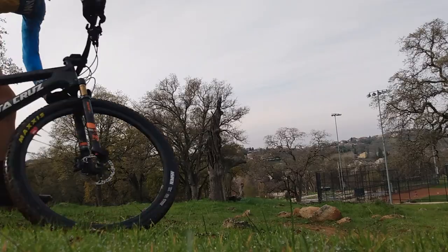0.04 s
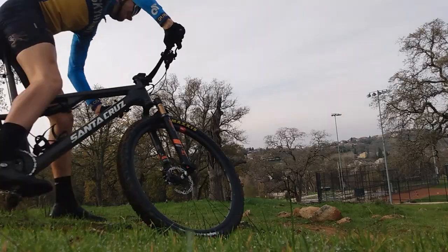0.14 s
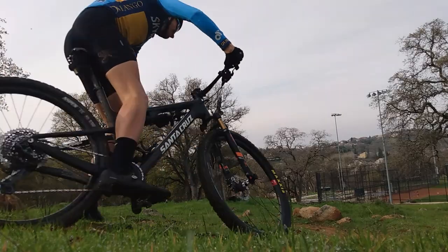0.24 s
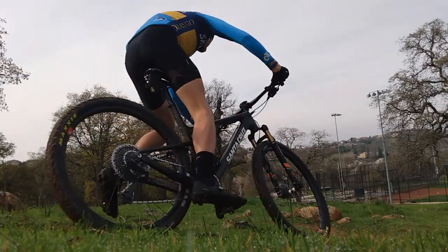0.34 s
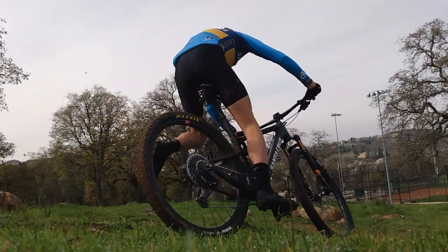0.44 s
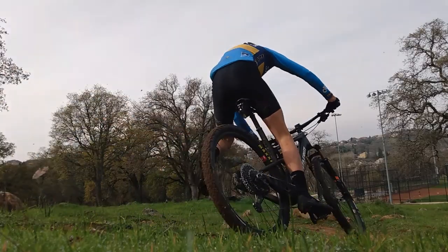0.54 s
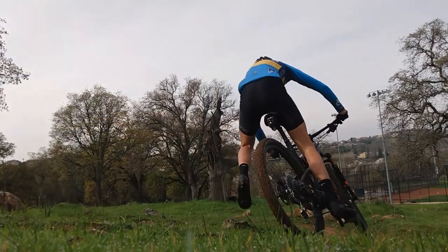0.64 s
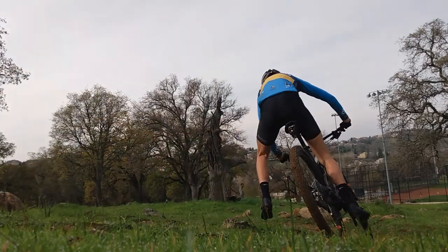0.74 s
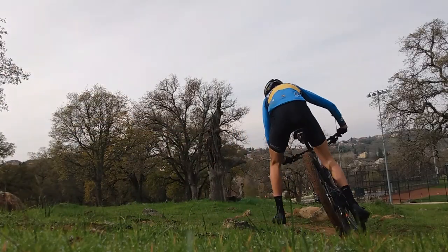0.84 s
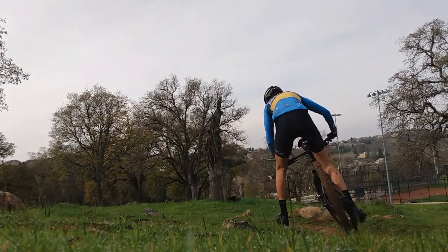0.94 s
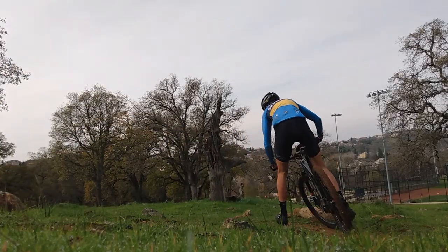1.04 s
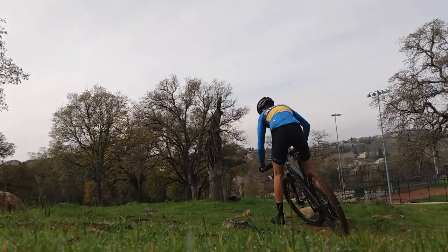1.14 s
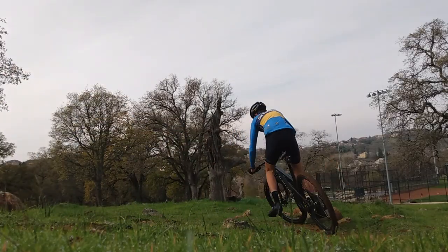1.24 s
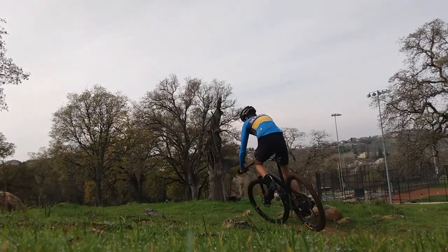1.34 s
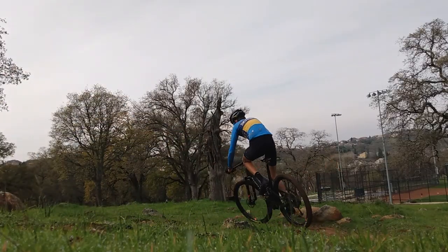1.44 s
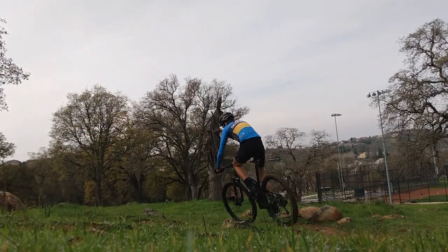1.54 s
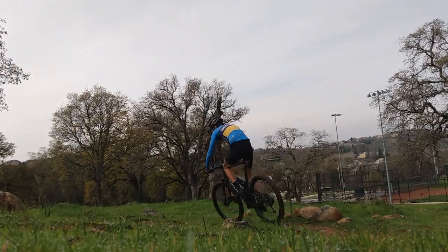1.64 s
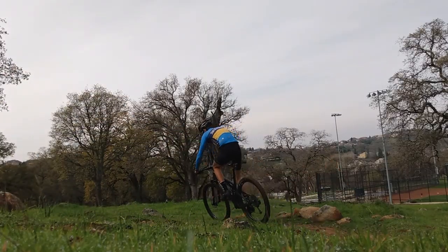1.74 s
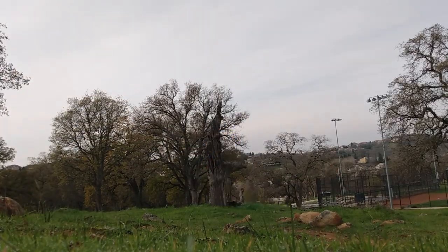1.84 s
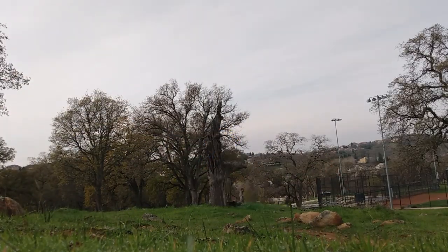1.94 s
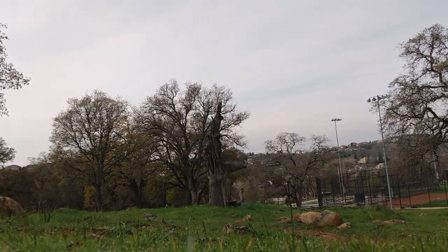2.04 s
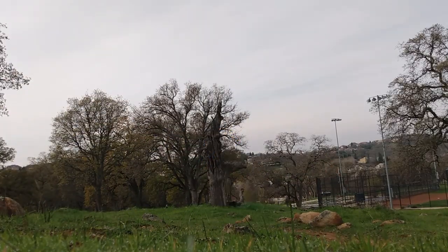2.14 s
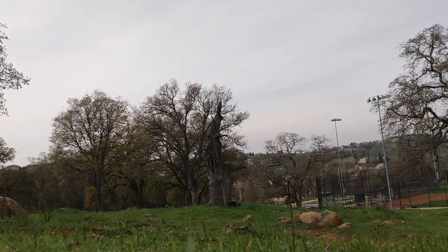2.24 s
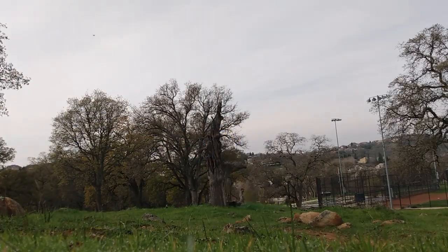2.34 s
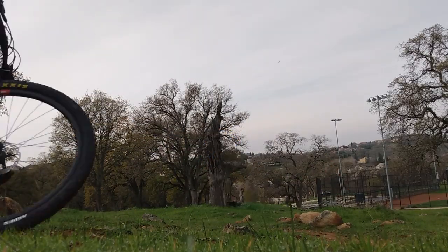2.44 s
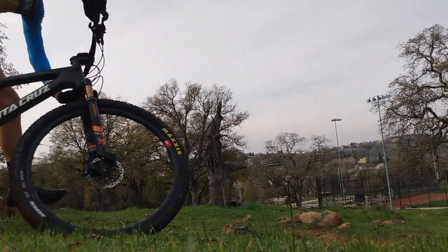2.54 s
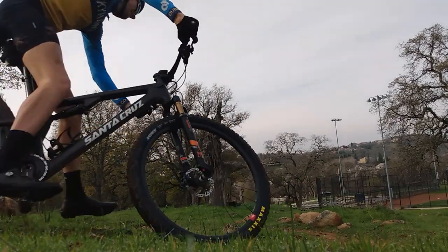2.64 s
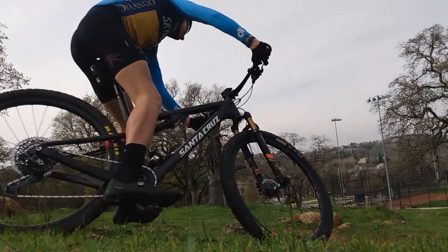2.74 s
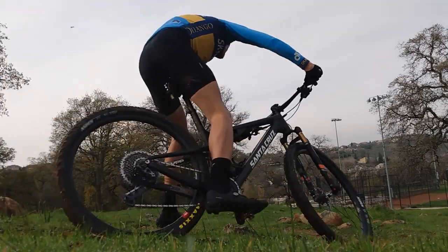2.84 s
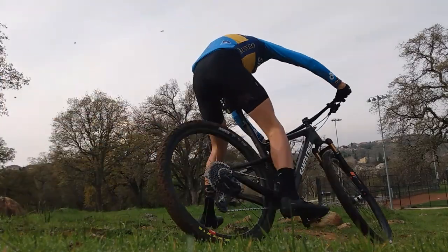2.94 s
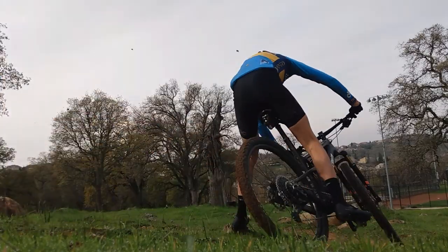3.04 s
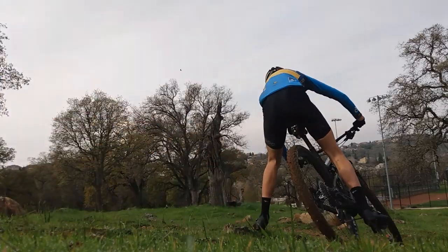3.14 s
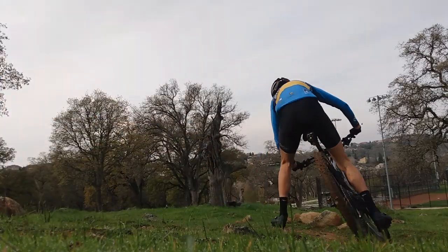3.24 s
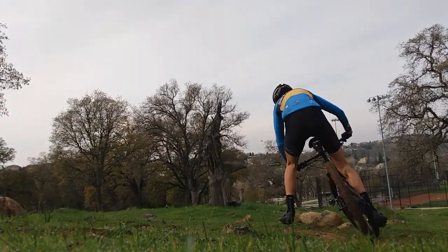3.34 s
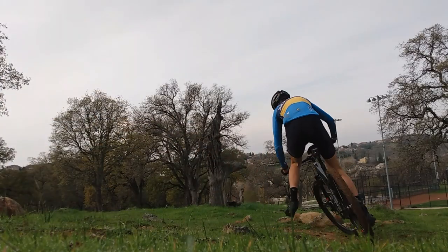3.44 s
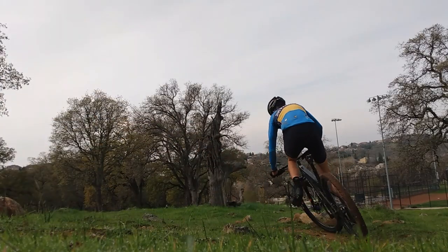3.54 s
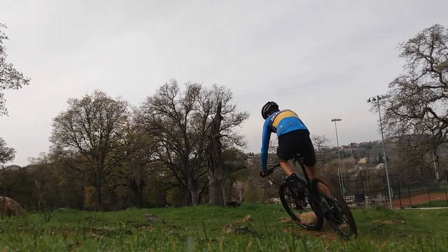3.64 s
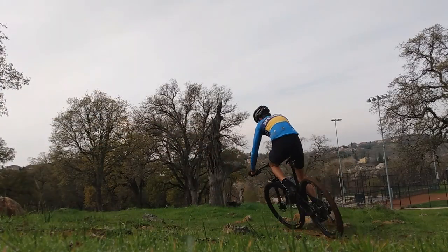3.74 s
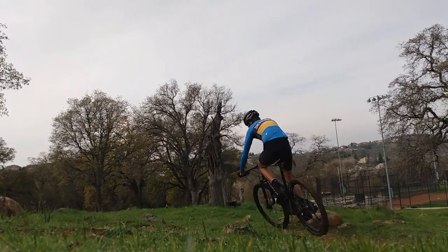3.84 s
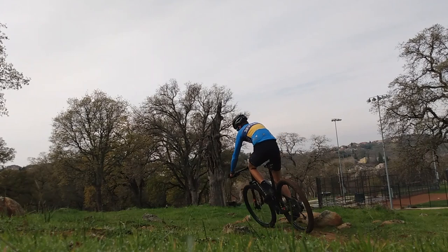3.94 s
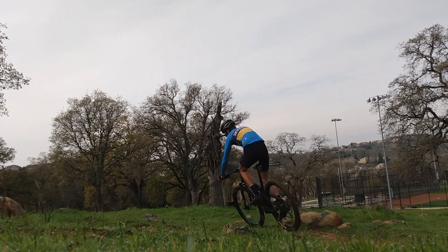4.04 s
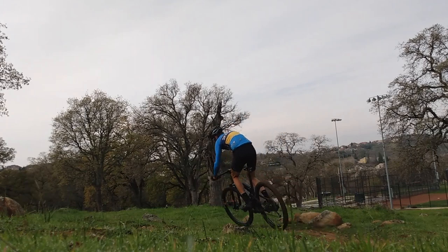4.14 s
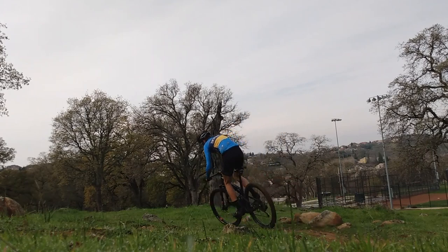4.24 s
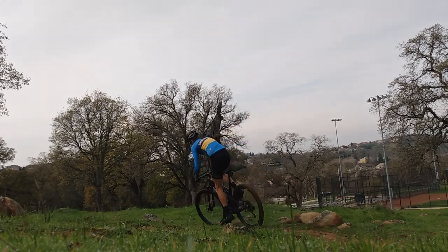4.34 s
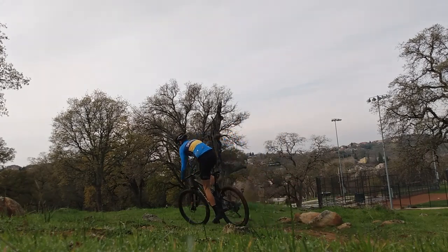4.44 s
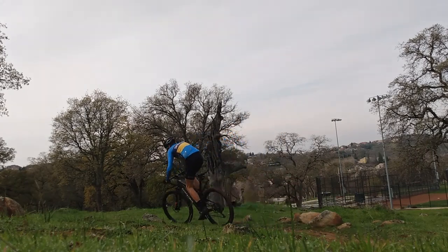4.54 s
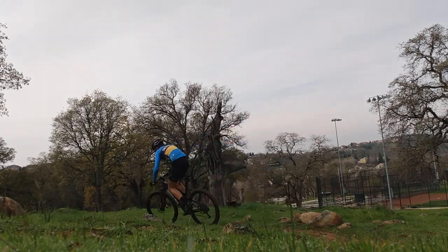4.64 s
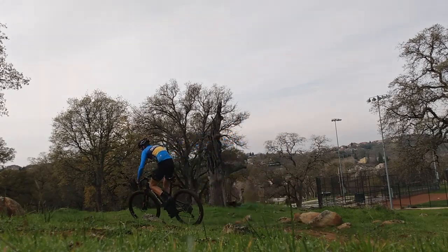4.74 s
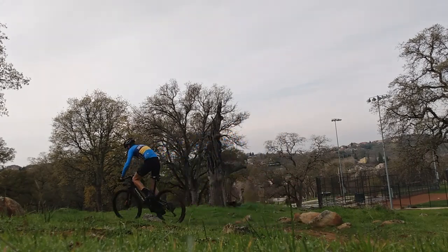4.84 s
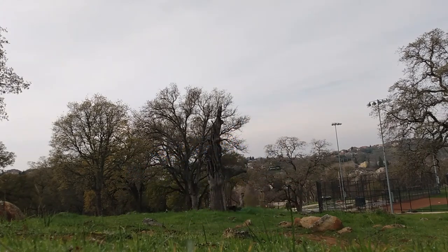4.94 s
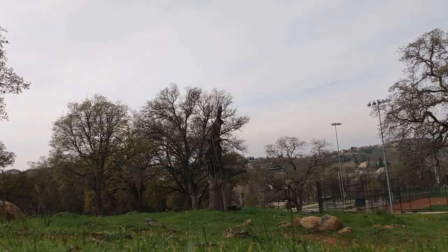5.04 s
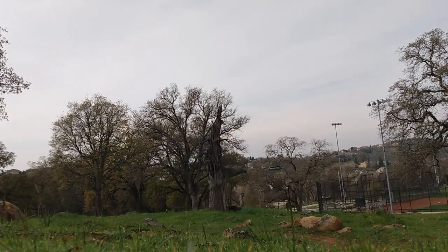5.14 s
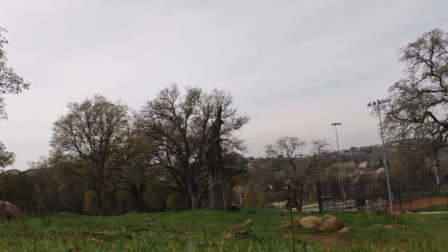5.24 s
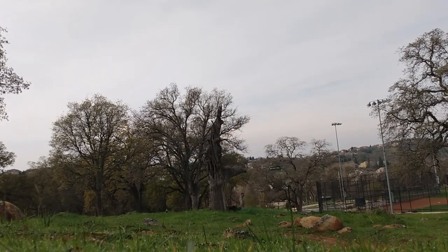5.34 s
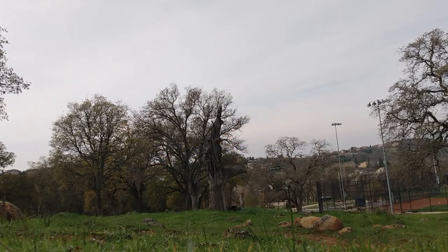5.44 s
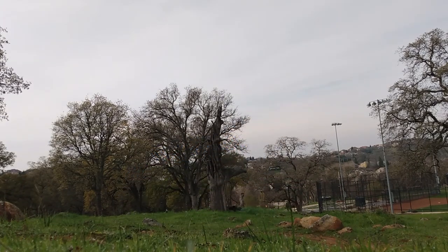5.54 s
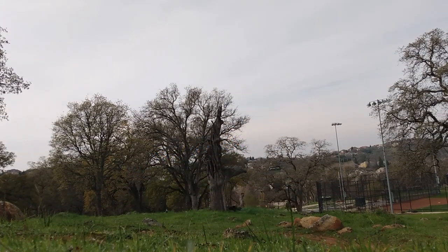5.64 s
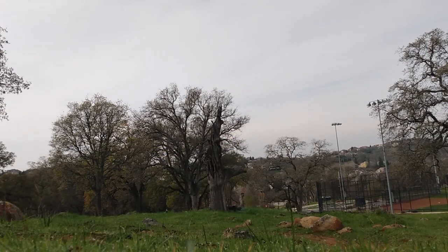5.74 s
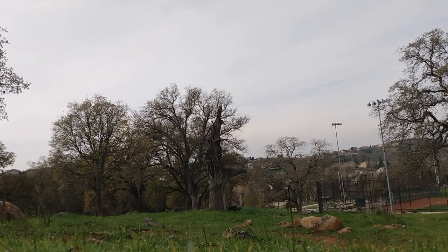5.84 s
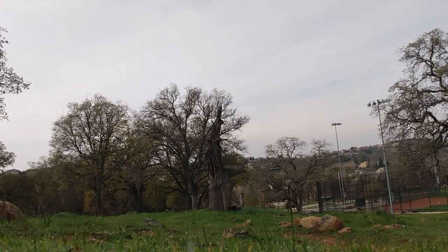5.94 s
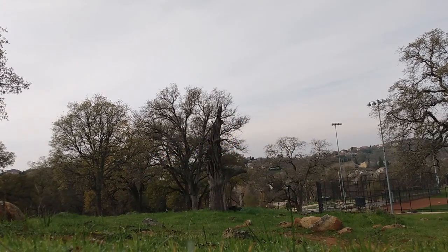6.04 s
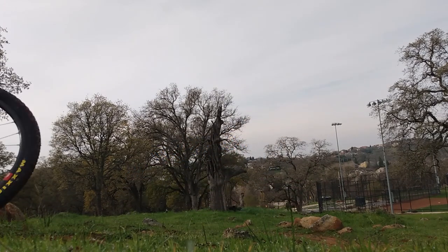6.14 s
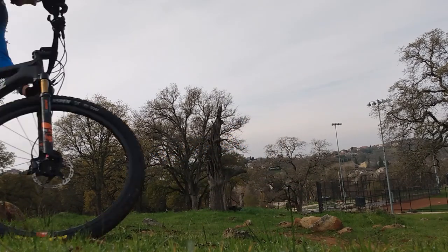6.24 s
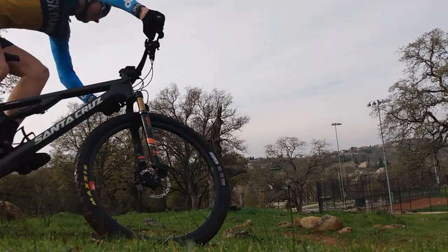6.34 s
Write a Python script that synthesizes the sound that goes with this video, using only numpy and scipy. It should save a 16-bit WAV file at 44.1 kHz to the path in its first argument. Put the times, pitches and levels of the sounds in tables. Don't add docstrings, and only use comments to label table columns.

```python
import sys
import numpy as np
from scipy import signal
from scipy.io import wavfile
from scipy.ndimage import uniform_filter1d

SR = 44100
rng = np.random.default_rng(int(sys.argv[2]) if len(sys.argv) > 2 else 0)


def digitize_waveform(pressure):
    field = np.atleast_2d(pressure).T
    bounded = np.clip(field, -1, 1)
    quanta = np.round(bounded * 32767).astype(np.int16)
    wavfile.write(sys.argv[1], SR, quanta)


def convert_level_to_amplitude(level_db):
    exponent = np.asarray(level_db, float) / 20
    return 10 ** exponent


N = 281648

# time of silence in seconds, fade out in seconds, fade in in seconds.
JOINS = [
    (1.864, 0.051, 0.064),
    (4.964, 0.032, 0.036),
]
# time in seconds, lag of the left microphone in ms.
LEFT_LAG_MS = [(0, 0.36), (.25, 0.37), (.4, 0.18), (.55, 0.026), (.8, -0.13), (1.5, -0.13), (1.86, 0.094),
               (1.88, 0.4), (2.65, 0.37), (2.85, 0.25), (3.05, 0.025), (3.35, -0.19), (4.96, 0.03),
               (4.98, 0.45), (6.15, 0.36), (6.39, 0.35)]
# centre in Hz, width in Hz, depth in dB.
FAR_DIPS = [(4600, 300, -11), (6900, 400, -10), (9300, 1300, -7)]

# peak in seconds, level in dB, left over right in dB.
GUSTS = [(.12, -46.5, -4), (.31, -37, -1), (.6, -61, -7), (.83, -50, 8), (.96, -63, 12), (1.07, -54, 11),
         (1.25, -56, -1), (1.55, -60, -10), (1.68, -52.5, 6), (1.8, -49.5, -13), (2.17, -68, 1),
         (2.64, -48, 2), (2.78, -48, -1), (2.9, -60, 4), (3.21, -46.5, -1), (3.52, -64, 14),
         (3.77, -70, -8), (3.94, -64.5, 10.5), (5.161, -62, 13.5), (5.45, -71, 7), (5.691, -55, -11.5),
         (6.1, -66, 0), (6.35, -53, -9)]
GUST_DB_PER_S, CALM_DB = 76, -85
# frequency in Hz, gain in dB.
RUMBLE_SPECTRUM = [(25, -42.5), (55, -9.5), (80, 0.5), (130, -0.5), (180, -15), (220, -18.5), (290, -44.5),
                   (480, -120)]
# frequency in Hz, gain in dB.
AIR_SPECTRUM = [(10, -14), (25, -3), (45, -3), (70, -20), (120, -60.5)]
AIR_DB, AIR_EXPONENT = -27, 0.68

# time in seconds, level in dB.
GRASS_DB = [(0.0, -41), (0.41, -40.5), (0.44, -49.5), (0.75, -45.5), (1.08, -61.5), (1.86, -57),
            (1.88, -70.5), (2.12, -51.5), (2.42, -52), (2.58, -40.5), (3.13, -45.5), (3.75, -62.5),
            (3.87, -54.5), (4.2, -72.5), (4.81, -77.5), (4.86, -58), (4.95, -73), (4.98, -86), (5.38, -74),
            (5.46, -67), (6.39, -45.5)]
# frequency in Hz, gain in dB.
GRASS_SPECTRUM = [(2650, -31.5), (4500, -2), (5180, -5.5), (5700, -5), (14200, -4), (16300, -4)]

# start in seconds, end in seconds, first Hz, last Hz, level in dB.
WHIRRS = [(0.854, 1.283, 1160, 907, -61), (0.93, 1.075, 1400, 1432, -58.5), (1.317, 1.353, 587, 604, -69),
          (1.435, 1.526, 278, 254, -67), (1.905, 2.046, 1050, 1097, -62.5),
          (3.238, 3.26, 1370, 1240, -37.5), (3.402, 3.582, 251, 236.4, -63), (4.08, 4.21, 1450, 1433, -79),
          (4.225, 4.265, 214, 230, -64.5), (4.239, 4.339, 354, 317, -65.5), (4.22, 4.34, 1400, 1390, -75.5),
          (4.232, 4.405, 640, 614, -78.5), (4.384, 4.48, 1400, 1420, -78), (5.148, 5.6, 1190, 1144, -83),
          (1.151, 1.35, 1330, 1285, -70), (4.362, 4.416, 356, 365, -72.5), (4.624, 4.661, 650, 644, -75.5),
          (4.715, 4.785, 718, 700, -67), (4.976, 5.15, 1003, 1004, -70.5), (4.992, 5.198, 1837, 1860, -78),
          (5.065, 5.292, 2460, 2270, -74.5), (5.261, 5.976, 2213, 2376, -72),
          (5.329, 5.445, 940, 1060, -71), (5.425, 5.52, 623, 803, -76.5), (5.413, 5.504, 240, 240, -75),
          (5.58, 5.984, 447.4, 766, -66.5)]
WHIRR_WIDTH = 0.17

# time in seconds, load in dB, lightness in dB (less carcass, more knobs).
ROLL = [(.44, -52, 0.5), (.9, -57, -3), (1.04, -74.5, 8), (1.6, -71.5, 5), (1.7, -58.5, -7),
        (1.9, -67.5, -1.5), (2.19, -57.5, -3), (2.35, -57, -2.5), (2.71, -47.5, 0), (3.26, -50.5, -0.5),
        (3.7, -71, 5.5), (3.98, -65.5, 3), (4.12, -84, 3), (4.9, -92.5, -5.5), (5.3, -81, 5.5),
        (5.66, -75, 8.5), (6.06, -56.5, -4.5), (6.39, -50, -0.8)]
CARCASS_DB_PER_LIGHT_DB = 0.91
# full bite in seconds, rise in seconds, hold in seconds, bite in dB,
# carcass weight in dB.
SCRUBS = [(0.0, .02, 0.0053, -28.5, -6.5), (0.028, .02, 0.046, -26.5, -13.5),
          (0.098, 0.019, 0.034, -27, -8), (0.162, 0.12, 0.074, -31.5, -4.5), (0.241, 0.1, 0.12, -34.5, -2),
          (0.363, .1, 0.06, -43.5, -5), (0.578, 0.04, 0.022, -49.5, -4), (0.709, 0.057, 0.086, -40, -1),
          (0.917, .08, 0.18, -61, -29), (1.664, 0.025, 0.003, -42, 6), (2.124, 0.12, 0.041, -45.5, 0.5),
          (2.561, 0.15, 0.044, -27.5, -8), (2.604, 0.045, 0.057, -33, -4), (3.199, 0.087, 0.014, -32, 2),
          (3.872, 0.019, 0.015, -49, 5.5), (4.256, 0.068, 0.022, -86, -1),
          (4.733, 0.12, 0.038, -74.5, -27.5), (4.829, 0.01, 0.0062, -50.5, -11),
          (4.866, 0.027, 0.055, -68.5, -25), (5.013, 0.086, 0.095, -76, -37), (5.437, 0.097, .02, -65, -16),
          (5.8, 0.07, 0.062, -68.5, 1.5)]
EDGE_DB, RELEASE_S = 24.5, 0.062
GRIT_DB, GRIT_DB_PER_WEIGHT_DB = -4.5, 0.6
# frequency in Hz, gain in dB.
THUD_SPECTRUM = [(120, -25), (200, -1), (372, -4), (454, -1.5), (680, -5.5), (880, -30), (1500, -120)]
# frequency in Hz, gain in dB.
CRUNCH_SPECTRUM = [(380, -45.5), (650, -9), (814, -1), (908, -2.5), (1550, -10.5), (2020, -37),
                   (3410, -120)]
# frequency in Hz, gain in dB.
GRIT_SPECTRUM = [(880, -40), (1500, -10.5), (1800, -7.5), (2710, -8.5), (4930, -20.5), (5500, -34.5),
                 (7150, -46.5), (12100, -120)]

# time in seconds, peak in dB, pitch in Hz.
STONES = [(0.032, -25, 2370), (0.049, -22, 1940), (0.065, -17.5, 804), (0.073, -12.5, 1070),
          (0.1, -31.5, 810), (0.111, -23, 834), (0.123, -5, 1050), (0.133, -17.5, 853), (0.15, -15, 2650),
          (0.17, -27, 2450), (0.194, -23, 3050), (0.249, -30, 2280), (0.263, -35, 802), (0.277, -28, 830),
          (0.331, -31, 1280), (0.36, -21.5, 859), (2.537, -27.5, 837), (2.55, -24.5, 797),
          (2.562, -18, 848), (2.576, -19.5, 904), (2.582, -10.5, 875), (2.605, -24, 2270),
          (2.612, -22, 875), (2.622, -26, 845), (2.639, -42, 2574), (2.649, -33, 820)]
STONE_DB, STONE_BRIGHT_DB = -12.5, -12
# time in seconds, peak in dB, body or
# squeak pitch in Hz.
THUMPS = [(0.3122, -29.5, 300), (0.7768, -44, 666), (0.8437, -39.5, 650), (1.6517, -69.5, 382),
          (1.6717, -32.5, 830), (1.7745, -50, 570), (1.8188, -43, 590), (2.058, -47.5, 3530),
          (2.059, -42, 7030), (2.0953, -31, 1650), (2.1255, -31, 1440), (2.143, -32, 635),
          (2.1597, -32, 596), (2.218, -50, 507), (3.196, -24, 786), (3.2192, -21, 525), (3.2549, -39, 710),
          (3.849, -50, 660), (3.8768, -30, 679), (3.881, -29, 1574), (4.6962, -57, 734),
          (4.834, -41.5, 1070), (5.8839, -57, 676), (6.2617, -43, 403)]
THUMP_BRIGHT_DB = -26
# time in seconds, peak in dB, body in Hz, bright clack in dB.
KNOCKS = [(0.2078, -43, 2620, 19.5), (0.297, -28, 320, 2), (0.406, -48, 320, 4.5), (0.4136, -35.5, 300, 13),
          (0.7823, -33, 517, -18), (0.79, -32.5, 478, -18), (1.6682, -41, 342, 16.5),
          (1.6779, -45, 464, 18.5), (1.7293, -40, 960, -2), (1.8956, -44, 544, -11),
          (2.1045, -50, 900, 21.5), (1.6645, -34, 250, -2), (2.1059, -28.5, 980, -27),
          (2.1675, -40, 554, 3), (3.1401, -30, 790, -2), (3.187, -16.5, 620, -8.5),
          (3.2045, -15.5, 700, -6.5), (3.2065, -20.5, 800, -3.5), (3.2114, -12.5, 750, -17),
          (3.2247, -34.5, 600, 7.5), (3.8887, -29.5, 945, -3.5), (4.406, -67, 368, 6),
          (4.715, -55, 715, -9.5), (4.8465, -43, 620, 6.5), (5.759, -66, 2720, 7), (6.2498, -40.5, 550, 2)]

CHAIN_S, CHAIN_PER_S = (4.13, 4.95), 450
CHAIN_DB, CHAIN_SPREAD_DB = -63, 2.5
# first tick in seconds, last tick in seconds, mean gap in ms,
# last gap over first gap.
COAST = [(.0405, .359, 15.9, 1), (.372, .4123, 13.4, 1), (.4372, .4572, 20, 1), (.471, .5346, 10.6, .85),
         (.5489, .6952, 18.3, 1), (.7271, .8388, 22.3, 1), (.855, .9076, 13.2, 1.3),
         (.927, 1.0045, 19.4, .55), (1.019, 1.1234, 17.4, 1), (1.1345, 1.2277, 13.3, 1.1),
         (1.243, 1.3263, 16.7, 1.1), (1.3421, 1.48, 15.3, 1), (1.4966, 1.6352, 17.3, .95),
         (1.6494, 1.708, 14.6, 1), (1.7243, 1.847, 24.5, 1.35), (2.3027, 2.7143, 16, 1.4),
         (2.7294, 2.8005, 11.9, 1), (2.817, 2.9235, 11.8, .65), (2.9686, 3.1489, 12.9, 1.05),
         (3.1661, 3.3963, 14.4, .9), (3.4235, 3.485, 15.4, 1.2), (3.5338, 3.5554, 10.8, 1),
         (3.575, 3.5997, 12.3, .8), (3.622, 3.7377, 12.9, .75), (3.756, 3.813, 19, 1),
         (3.827, 3.8615, 11.5, 1), (3.895, 3.958, 15.8, 1), (3.9725, 4.111, 27.7, 1.3),
         (5.3088, 5.6687, 12, 1), (5.7097, 5.9126, 13.5, 1), (5.929, 6.0559, 15.9, 1),
         (6.0682, 6.1534, 14.2, 1), (6.1708, 6.3729, 15.5, 1)]
TICK_JITTER_S = .0005
# time in seconds, peak in dB.
PAWL_DB = [(.037, -37.5), (.41, -38.5), (.44, -35.5), (.87, -41.5), (1.06, -42), (1.65, -39), (1.82, -44.5),
                      (2.3, -64), (2.89, -33.5), (3.48, -44), (3.56, -39), (3.62, -40.5), (3.72, -41),
           (3.82, -43), (4.11, -40.5), (5.31, -68.5), (5.45, -66), (5.65, -55.5), (5.9, -59), (6.37, -42)]
# time in seconds, peak in dB.
RATTLE = [(1.666, -29), (2.0919, -50), (2.104, -36.5), (2.2434, -49), (2.294, -46), (3.512, -40),
          (3.6512, -38), (3.6782, -38), (3.7144, -38.5), (3.727, -41), (3.756, -38.5), (0.8648, -36.5),
          (1.088, -47), (1.534, -49), (1.6, -43), (3.8806, -32), (4.166, -60), (4.2448, -54.5),
          (4.2705, -59), (4.283, -52), (4.2973, -63), (4.3912, -58), (4.403, -42), (4.4316, -66),
          (4.3633, -61), (4.5247, -63), (4.5464, -58.5), (1.9357, -61), (1.9706, -56), (1.9791, -53),
          (2.2245, -64), (4.446, -51), (4.498, -61.5), (4.595, -49), (4.624, -62), (4.6435, -56),
          (4.692, -61), (4.714, -52), (4.751, -57), (4.772, -59), (4.8326, -38), (4.844, -40), (4.898, -54),
          (4.9466, -51.5), (5.692, -47), (5.754, -46)]
# frequency in Hz, gain in dB.
HUB_SPECTRUM = [(1180, -59), (2000, -40), (2740, -8), (4180, -16.5), (4690, -13), (6260, -8.5),
                (7080, -5.5), (10900, -3), (15100, -2), (16300, -9)]
FAR_THINS, THIN_HZ = .62, 11800

LIMIT = .75
EDGE_HZ = 15950


def evened(x):
    return x / np.sqrt(np.mean(x ** 2) + 1e-20)


def curve(rows, axis=1):
    rows = np.asarray(rows, float)
    return np.interp(np.arange(N) / SR, rows[:, 0], rows[:, axis])


def colour(x, points, size=4096):
    f, db = np.transpose(points)
    hz = abs(np.fft.fftfreq(size, 1 / SR))
    gain_db = np.interp(np.log(hz + 1), np.log(f + 1), db, left=-70, right=-70)
    log_gain = np.log(convert_level_to_amplitude(gain_db))
    taps = np.fft.ifft(np.exp(np.conj(signal.hilbert(log_gain)))).real[:size // 2]
    return signal.oaconvolve(x, taps[None], axes=1)[:, :N]


def paired(x, same):
    same = np.clip(same, 0, 1)
    return np.array([x[0], same * x[0] + np.sqrt(1 - same ** 2) * x[1]])


def grains(per_s, spread_db, clump_db, clump_s):
    clumps = evened(uniform_filter1d(rng.standard_normal(N), max(int(clump_s * SR), 2)))
    sizes = convert_level_to_amplitude(spread_db * np.minimum(rng.exponential(1, (2, N)), 5))
    signs = rng.choice([-1., 1.], (2, N))
    hits = rng.random((2, N)) < per_s / SR
    return sizes * signs * hits * convert_level_to_amplitude(clump_db * clumps)


def far(t):
    return np.clip((-48 - np.interp(t, *np.transpose(GRASS_DB))) / 22, 0, 1)


def patches(shape, wide, long):
    field = uniform_filter1d(rng.standard_normal(shape), wide, 0)
    return evened(uniform_filter1d(field, long, 1))


def patchy(x, near_db, far_db, wide, long):
    hz, t, z = signal.stft(x, SR, nperseg=1024, noverlap=768)
    depth_db = near_db + (far_db - near_db) * far(t)
    z = z * convert_level_to_amplitude(depth_db * patches(z.shape[1:], wide, long))
    return signal.istft(z, SR, nperseg=1024, noverlap=768)[1][:, :N]


def gusts():
    t, cuts = np.arange(N) / SR, np.transpose(JOINS)[0]
    power = convert_level_to_amplitude(CALM_DB) ** 2
    for s, db, pan_db in GUSTS:
        same_pass = np.searchsorted(cuts, t) == np.searchsorted(cuts, s)
        pan = convert_level_to_amplitude(np.minimum([[pan_db], [-pan_db]], 0))
        power = power + (convert_level_to_amplitude(db - GUST_DB_PER_S * abs(t - s)) * same_pass * pan) ** 2
    return np.sqrt(power)


def wind():
    puffs = gusts()
    rumble = paired(colour(grains(3600, 0.9, 1.0, 0.0088), RUMBLE_SPECTRUM), 0.66)
    air = evened(colour(rng.standard_normal((2, N)), AIR_SPECTRUM, size=16384))
    return puffs * evened(rumble) + convert_level_to_amplitude(AIR_DB) * puffs ** AIR_EXPONENT * air


def grass():
    hiss = paired(colour(grains(20000, 2.2, 3.0, 0.0058), GRASS_SPECTRUM), 0.19)
    return patchy(convert_level_to_amplitude(curve(GRASS_DB) - 1.5) * evened(hiss), 1.5, 3.5, wide=8, long=30)


def whirr():
    out = np.zeros((2, N))
    for first, last, first_hz, last_hz, db in WHIRRS:
        share = np.linspace(0, 1, round((last - first) * SR))
        r = np.exp(-np.pi * WHIRR_WIDTH * first_hz / SR)
        noise = rng.standard_normal((2, 2, len(share)))
        slow = signal.lfilter([1], [1, -2 * r, r * r], noise[0] + 1j * noise[1])
        turns = np.cumsum(first_hz * (last_hz / first_hz) ** share) / SR
        hum = paired(evened((slow * np.exp(2j * np.pi * turns)).real), 0.56)
        swell = np.sqrt(abs(np.sin(np.pi * share)))
        out[:, round(first * SR):][:, :len(share)] += convert_level_to_amplitude(db) * swell * hum
    return out


def bite():
    t, light_db = np.arange(N) / SR, curve(ROLL, axis=2)
    carcass_db = -CARCASS_DB_PER_LIGHT_DB * np.maximum(light_db, -3)
    power = convert_level_to_amplitude(curve(ROLL) + np.array([carcass_db, 0 * t, light_db])) ** 2
    for s, rise, hold, db, weight_db in SCRUBS:
        away = np.maximum(np.maximum((s - t) / rise, (t - s - hold) / RELEASE_S), 0)
        grit_db = GRIT_DB - GRIT_DB_PER_WEIGHT_DB * max(weight_db - 0.5, 0)
        layers_db = np.array([[weight_db], [0], [grit_db]])
        power = power + convert_level_to_amplitude(db + layers_db) ** 2 * convert_level_to_amplitude(-EDGE_DB * away) ** 2
    return np.sqrt(power)


def tyres():
    snaps = grains(2100, 2.01, 1.7, 0.011)
    thud = paired(colour(snaps, THUD_SPECTRUM), 0.96)
    crunch = paired(colour(snaps, CRUNCH_SPECTRUM), 0.94)
    grit = paired(colour(snaps, GRIT_SPECTRUM), 0.78)
    dirt = sum(gain * evened(x) for gain, x in zip(bite(), [thud, crunch, grit]))
    bass = signal.sosfiltfilt(signal.butter(4, 240, fs=SR, output="sos"), dirt)
    dirt = dirt - 0.63 * far(np.arange(N) / SR) * bass
    return patchy(dirt, 1.5, 5.5, wide=3, long=24)


def knocks():
    thumps = [(*row, THUMP_BRIGHT_DB) for row in THUMPS]
    stones = [(s, db + STONE_DB, hz, STONE_BRIGHT_DB) for s, db, hz in STONES]
    out, t = np.zeros((2, N + SR)), np.arange(-100, 1500) / SR
    for s, db, hz, bright_db in [*KNOCKS, *thumps, *stones]:
        noise = rng.standard_normal((2, len(t)))
        turn, bright_hz = rng.uniform((0, 1900), (1, 3000))
        squeak = hz > 3200
        cycles = 9 if squeak else 0.48 + (db < -44)
        swell = np.exp(-.5 * ((t - 0.0017 * squeak) * hz / cycles) ** 2)
        blow = swell * np.cos(2 * np.pi * (hz * t + turn))
        clack = np.cos(2 * np.pi * bright_hz * t) + .5 * noise[0]
        clack = np.exp(-abs(t) / 0.00035) * clack * convert_level_to_amplitude(bright_db - 1.5)
        b, a = signal.butter(2, [0.78 * hz, 2.29 * hz], "bandpass", fs=SR)
        tail = evened(paired(signal.lfilter(b, a, noise), 0.35))
        tail = 0.18 * (not squeak) * tail * convert_level_to_amplitude(-60 * abs(t) / np.where(t > 0, .04, .006))
        start = round(s * SR) - 100
        out[:, start:start + len(t)] += convert_level_to_amplitude(db + 7.5) * (blow + clack + tail)
    return signal.sosfilt(signal.butter(4, 230, "highpass", fs=SR, output="sos"), out[:, :N])


def chain():
    t = np.arange(N) / SR
    links = (rng.random(N) < CHAIN_PER_S / SR) & (t > CHAIN_S[0]) & (t < CHAIN_S[1])
    return links * convert_level_to_amplitude(CHAIN_DB + CHAIN_SPREAD_DB * rng.standard_normal(N))


def pawls():
    spells = []
    for first, last, gap_ms, slowing in COAST:
        gaps = np.linspace(1, slowing, round(1000 * (last - first) / gap_ms))
        turns = np.cumsum([0, *gaps])
        spells.append(first + (last - first) * turns / turns[-1])
    s = np.concatenate(spells)
    return s + TICK_JITTER_S * rng.standard_normal(len(s))


def ratchet():
    ticks = pawls()
    rattle_s, rattle_db = np.transpose(RATTLE)
    tick_db = np.interp(ticks, *np.transpose(PAWL_DB)) + 0.76 * rng.standard_normal(len(ticks))
    at = (np.concatenate([ticks, rattle_s]) * SR).astype(int)
    db = np.concatenate([tick_db, rattle_db])
    crisp_db = 1.1 * rng.uniform(-1, 1, len(at))
    rings, snaps, t = np.zeros(N), np.zeros(N), np.arange(SR // 20) / SR
    rings[at] = convert_level_to_amplitude(db - 2)
    snaps[at] = convert_level_to_amplitude(db + crisp_db + 5.0)
    rings = rings + chain()
    ring_decay = (1 - np.exp(-t / .001)) * convert_level_to_amplitude(-60 * t / .045)
    snap_decay = (1 - np.exp(-t / .0004)) * convert_level_to_amplitude(-60 * t / .011)
    power = signal.oaconvolve(rings ** 2, ring_decay ** 2)[:N]
    power += signal.oaconvolve(snaps ** 2, snap_decay ** 2)[:N]
    metal = colour(rng.standard_normal((2, N)), HUB_SPECTRUM)
    metal = evened(patchy(metal, 2.0, 2.0, wide=50, long=3))
    low = signal.sosfiltfilt(signal.butter(2, THIN_HZ, fs=SR, output="sos"), metal)
    metal = metal - FAR_THINS * far(np.arange(N) / SR) * low
    return paired(metal, 0.19) * np.sqrt(abs(power))


def scene():
    mix = wind() + grass() + whirr() + tyres() + knocks() + ratchet()
    hz, t, z = signal.stft(mix, SR, nperseg=256, noverlap=192)
    hz = hz[:, None]
    lag_ms = np.interp(t, *np.transpose(LEFT_LAG_MS))
    treble = 1 / (1 + (5000 / (hz + 1)) ** 2)
    pan_db = (.9 - 1.7 * lag_ms) + treble * (3.5 - 11.0 * lag_ms)
    z *= convert_level_to_amplitude(-11 * far(t) * np.exp(-((hz - 8200) / 2900) ** 2))
    dips_db = sum(db * np.exp(-((hz - f) / width) ** 2) for f, width, db in FAR_DIPS)
    z *= convert_level_to_amplitude(dips_db * far(t) ** .6 * np.clip(lag_ms / .35, 0, 1))
    z[0] *= convert_level_to_amplitude(.5 * pan_db)
    z[1] *= convert_level_to_amplitude(-.5 * pan_db) * np.exp(2j * np.pi * hz * lag_ms / 1000)
    return signal.istft(z, SR, nperseg=256, noverlap=192)[1][:, :N]


def gate(x, under_db, cut_db):
    hz, t, z = signal.stft(x, SR, nperseg=1024, noverlap=768)
    power = uniform_filter1d((abs(z) ** 2).mean(0), size=8, axis=0)
    power = uniform_filter1d(power, size=6, axis=1)
    limit_db = -under_db + 4 * patches(power.shape, wide=6, long=12)
    weak = power < power[hz > 2000].mean(0) * convert_level_to_amplitude(2 * limit_db)
    weak = weak & (hz[:, None] > 250)
    z = z * np.where(weak, convert_level_to_amplitude(-cut_db), 1)
    return signal.istft(z, SR, nperseg=1024, noverlap=768)[1][:, :N]


def low_pass(x):
    return signal.sosfilt(signal.butter(12, 17140, fs=SR, output="sos"), x)


def record(dry):
    b, a = signal.iirpeak(4700, 6.0, SR)
    dry = dry - .6 * signal.lfilter(b, a, dry)
    dry = dry + convert_level_to_amplitude(-79.5) * signal.lfilter([1, -.4], [1], rng.standard_normal(dry.shape))
    wet = gate(dry, under_db=10, cut_db=20)
    wet = LIMIT * np.tanh(wet / LIMIT)
    t = np.arange(N) / SR
    for s, fall, rise in JOINS:
        wet = wet * np.clip(np.maximum((s - t) / fall, (t - s) / rise), .02, 1)
    taps = signal.firwin(255, EDGE_HZ, window=("kaiser", 6), fs=SR)
    return low_pass(signal.oaconvolve(wet, taps[None], "same"))


dry = scene()
out = record(dry)
digitize_waveform(out)
```